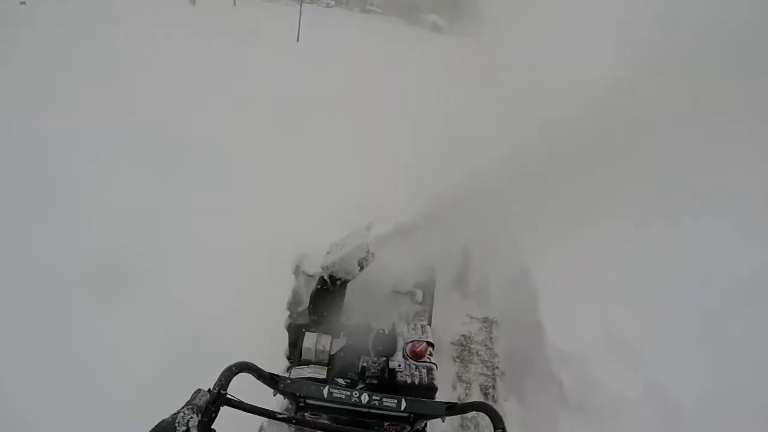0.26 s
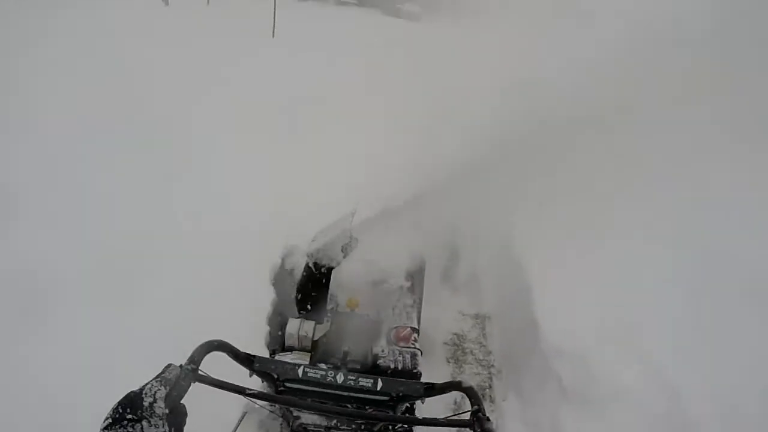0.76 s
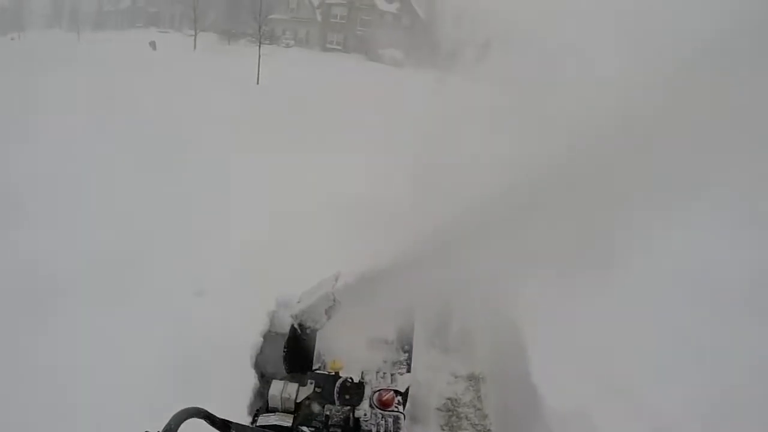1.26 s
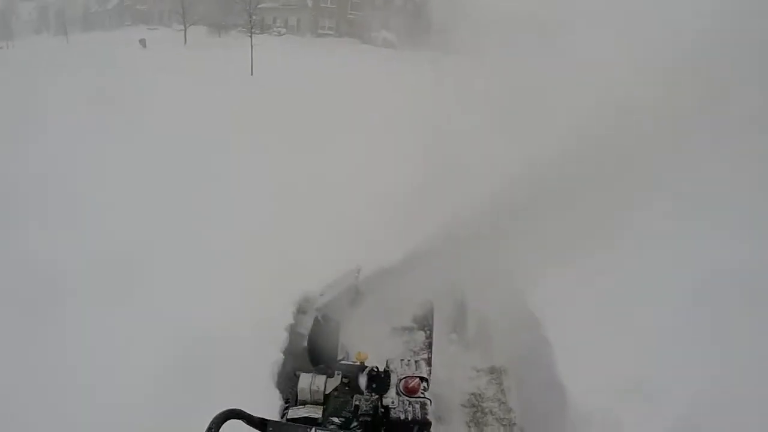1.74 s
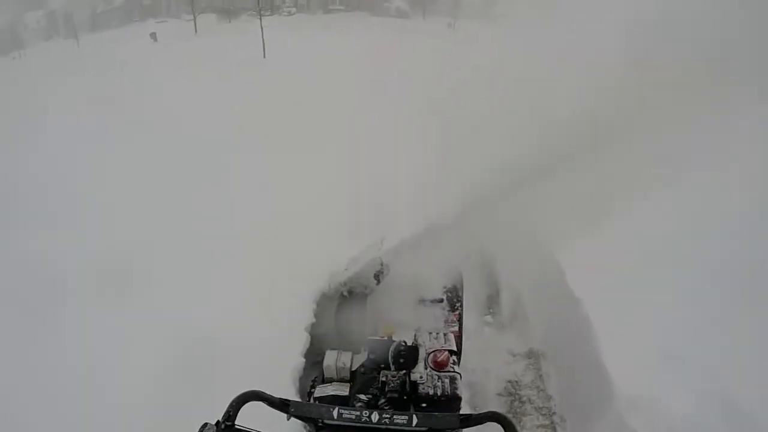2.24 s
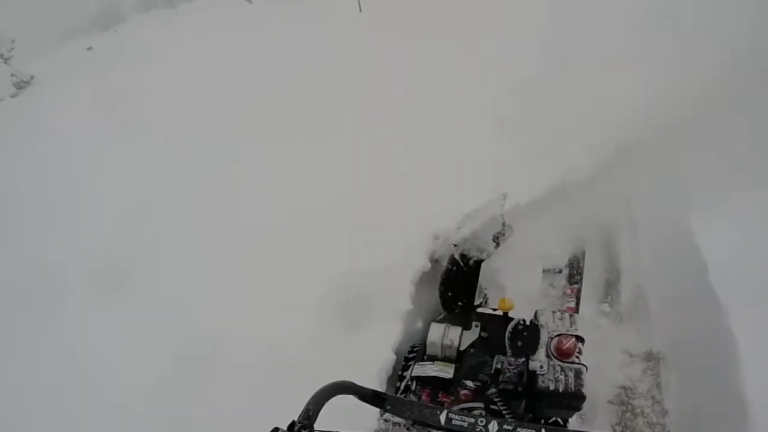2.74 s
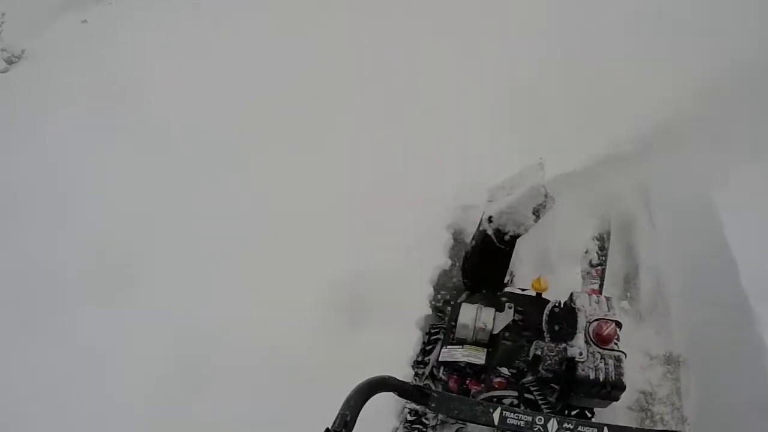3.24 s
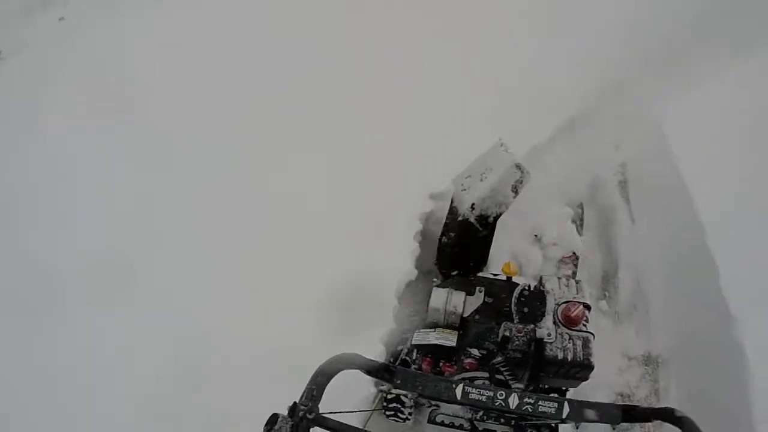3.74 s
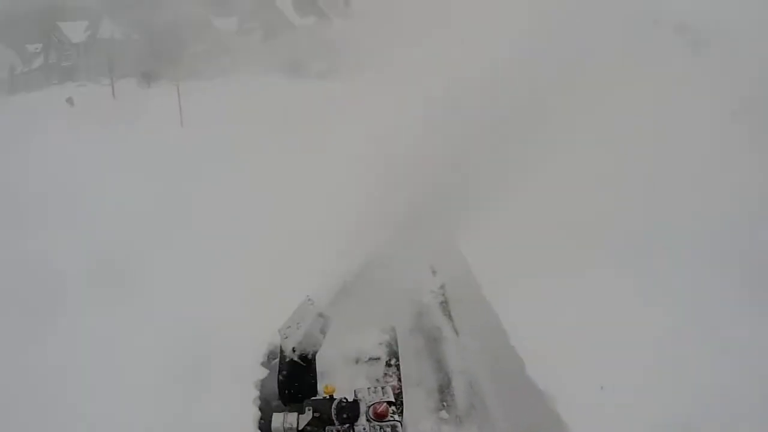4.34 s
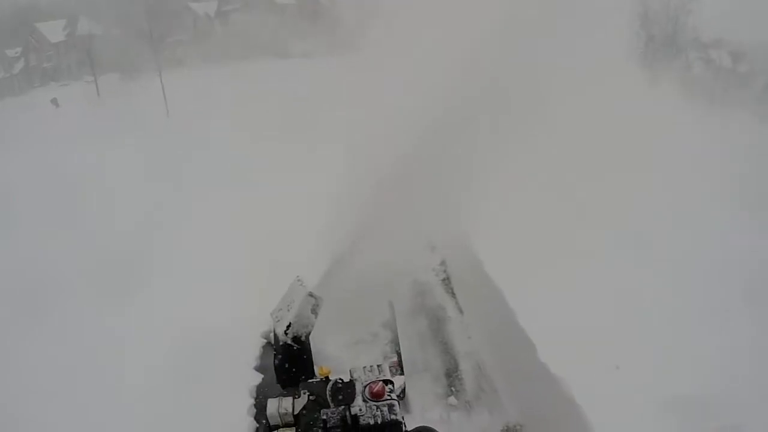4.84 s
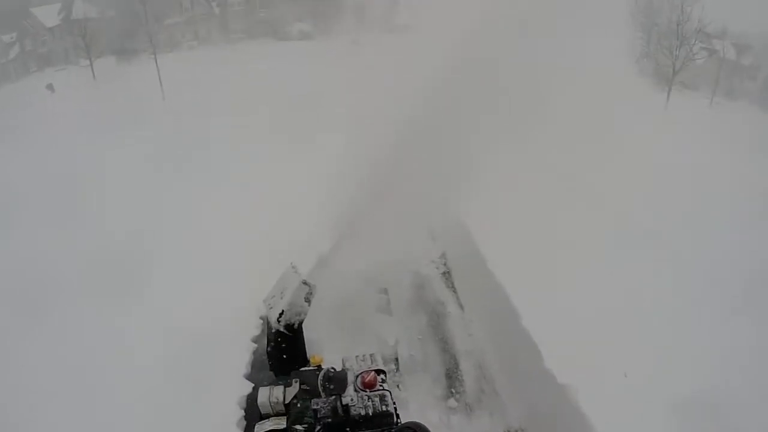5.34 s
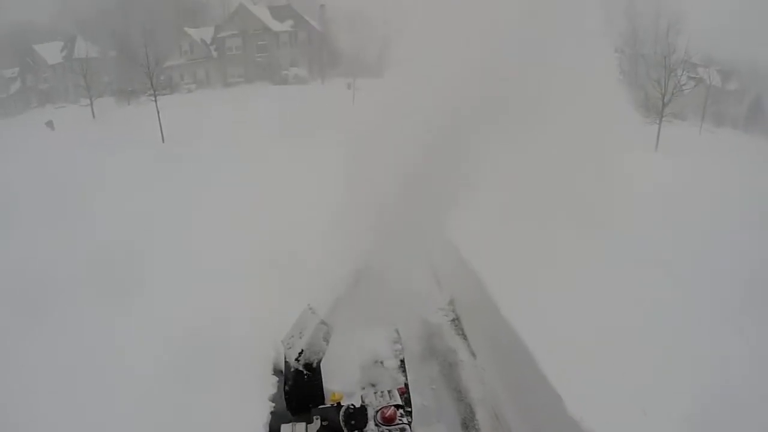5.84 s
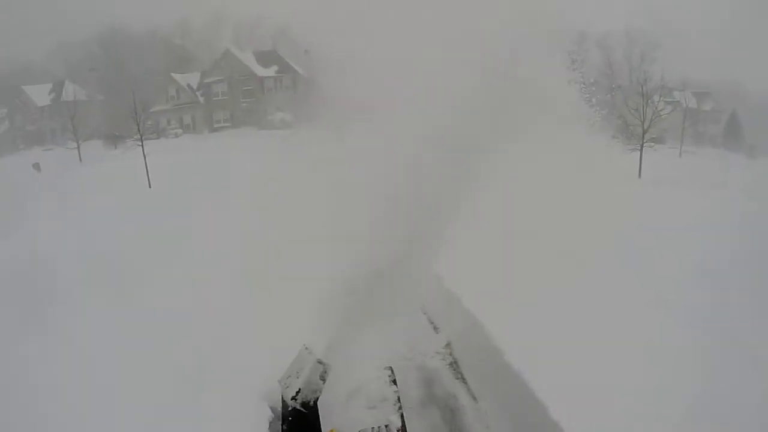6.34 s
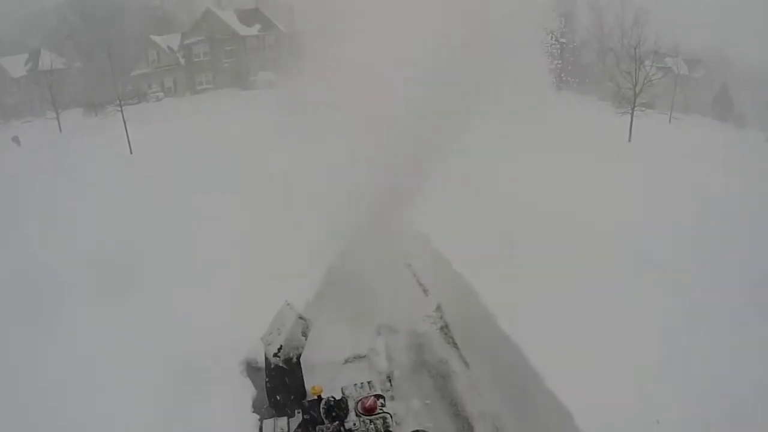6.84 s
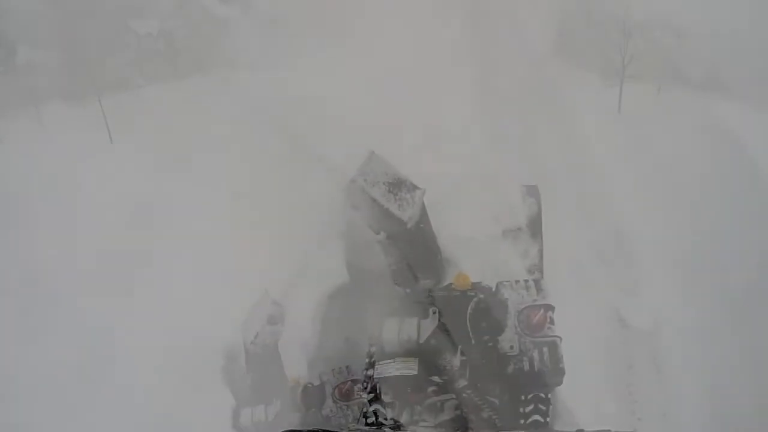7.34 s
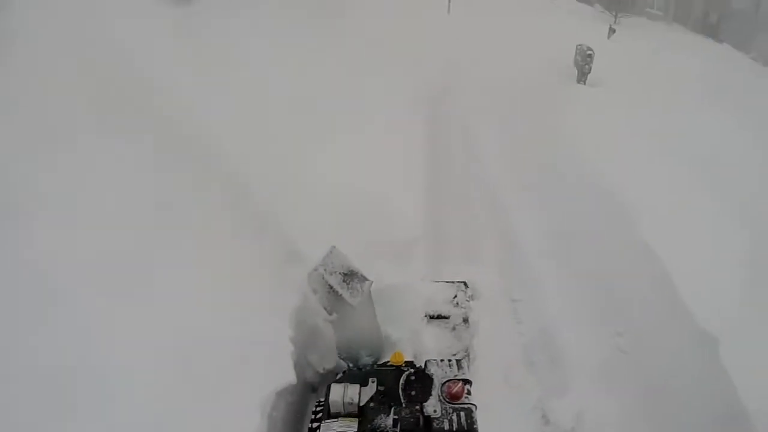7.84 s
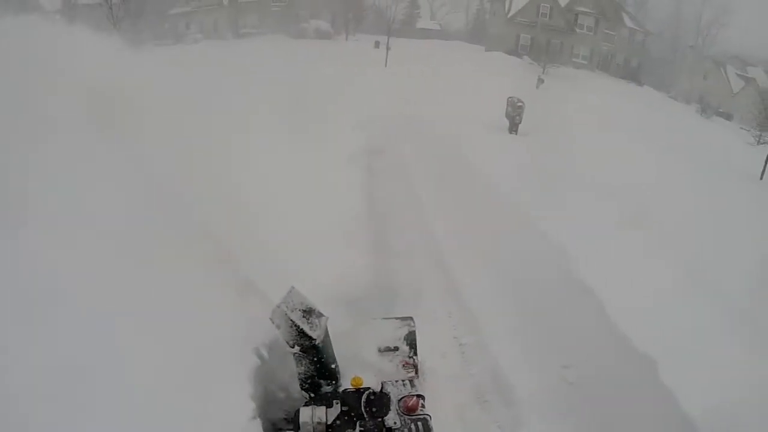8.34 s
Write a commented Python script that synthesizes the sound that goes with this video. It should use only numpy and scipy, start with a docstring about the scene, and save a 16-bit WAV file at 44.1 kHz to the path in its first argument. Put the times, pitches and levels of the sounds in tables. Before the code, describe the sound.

Close up, a snowblower engine putters and drones without pause while snow hisses through its chute and wind softly bumps the microphone.

```python
"""A rasping, whistling putter over a hum and a hiss: a petrol snowblower, heard from its handlebar.
Each firing of the single cylinder puffs gas out of the muffler. The belt-driven impeller beats against
the engine note, snow scours the chute, and wind and steps add low bumps. The sound swells as the listener
leans over the engine. At 7.29 s it jumps to a second pass, which starts in deep snow and then eases."""
import sys
import numpy as np
from scipy import signal
from scipy.fft import rfft, irfft, next_fast_len
from scipy.io import wavfile
from scipy.ndimage import map_coordinates

SR = 44100
rng = np.random.default_rng(int(sys.argv[2]) if len(sys.argv) > 2 else 0)


def bounce(signal):
    """Save signal as a 16-bit WAV file at the path given by the first command-line argument."""
    frames = np.transpose(np.atleast_2d(signal))
    limited = np.clip(frames, -1, 1)
    pcm = np.round(limited * 32767).astype(np.int16)
    wavfile.write(sys.argv[1], SR, pcm)


N = 378819
TIME_S = np.arange(N) / SR

# Engine speed per pass; the governor hunts. Each row: time in seconds, firings per second.
FIRING_RATE_FIRST = [(0.009, 27.812), (0.47, 28.01), (0.9, 27.789), (1.37, 27.548), (1.81, 27.781),
                     (2.28, 27.686), (2.75, 27.71), (3.18, 28.171), (3.64, 27.849), (4.11, 27.747),
                     (4.54, 28.142), (5.0, 27.73), (5.47, 27.784), (5.9, 27.809), (6.37, 27.882),
                     (6.8, 27.584), (7.27, 27.981)]
FIRING_RATE_SECOND = [(7.332, 26.666), (7.74, 27.3), (8.18, 27.6), (8.58, 27.582)]
# Firings of set strength, most accented. Each row: time in seconds, gain in dB.
BARKS = [(.116, 3.5), (.402, 2), (.76, 2), (.832, 0.5), (.939, 0), (1.12, 3), (2.854, 1.5), (3.068, 2),
         (3.46, 2), (3.64, 2.5), (3.962, 2), (8.066, 1.5), (8.465, 2.5)]
# Events in one cycle. Each row: start in seconds after the valve opens, rise in seconds, relative dB.
GAS_BURSTS = [(.0001, .00165, 0), (.0078, .0017, -12), (.015, .003, -21), (.0225, .002, -18)]  # blowdown first
KNOCKS = [(.0015, 0.0014, -3), (.0115, 0.00091, -1), (.0255, .0008, -22), (.029, 0.00045, -20)]  # valve gear and piston

# Resonances. Each row: centre in Hz, width in Hz, relative level in dB.
MUFFLER_MODES_FIRST = [(704, 210, -17), (1660, 600, -18), (2760, 1900, -15), (3436, 750, -6.5),
                       (4890, 400, -11), (5680, 650, -3.5), (6720, 540, -10), (8690, 960, -14.5),
                       (9220, 1600, -11), (9500, 1500, -14.5), (11560, 1260, -16), (13100, 1260, -20.5),
                       (15040, 1340, -30)]
MUFFLER_MODES_SECOND = [(650, 940, -17.5), (1830, 150, -7), (3180, 1600, -10.5), (3620, 470, -8),
                        (5120, 740, -5.5), (5650, 540, -3.5), (6600, 430, -7), (7300, 380, -11.5),
                        (8500, 630, -9), (9640, 1150, -6.5), (11100, 530, -14), (12340, 1890, -12.5),
                        (14780, 1200, -21)]
HOUSING_MODES_FIRST = [(250, 200, -9), (500, 700, -9), (730, 200, -11), (950, 130, -12), (1550, 350, -7),
                       (1760, 300, -2), (2410, 500, 1), (2930, 900, -4), (3500, 620, 0), (5060, 690, -1),
                       (5740, 620, -3), (6560, 800, -7), (9000, 2000, -12), (10050, 950, -14),
                       (11680, 1200, -18), (13530, 2300, -23.5)]  # steel housing and chute
HOUSING_MODES_SECOND = [(280, 200, -8), (520, 420, -14), (700, 250, -13), (930, 160, -15),
                        (1500, 1100, -16), (1800, 320, -3), (2360, 450, -5), (2870, 390, -4),
                        (3470, 1030, -4), (4880, 370, -4), (5430, 790, -3), (6560, 500, -8),
                        (8220, 3260, -15), (9300, 1150, -14), (11540, 2030, -20), (12480, 730, -15),
                        (14370, 1860, -24)]
CLOSE_MODES = [(2300, 1200, -13.5), (3640, 590, -4.5), (6540, 600, -3.5), (8360, 560, -7),
               (12200, 580, -35), (14600, 1000, -17)]  # heard just above the engine
UPRIGHT_MODES = [(2440, 280, -7), (5630, 560, 2.5), (10210, 760, -4), (11780, 700, -8), (13770, 850, -9)]  # heard standing upright
# Bands that cancel between the panels. Each row: centre in Hz, width in Hz, gain in dB.
PANEL_NOTCHES = [(1020, 43, -4), (1426, 47, -16), (1890, 53, -3), (4600, 820, -0.5)]

# Engine note. Each row: multiple of the firing rate, relative level in dB.
ENGINE_PARTIALS_FIRST = [(1, -61), (2, -49), (3, -57), (4, -52), (5, -50), (6, -53.5), (7, -56), (8, -47.5),
                         (9, -59), (10, -56), (11, -58), (12, -74), (14, -76), (15, -58), (17, -63),
                         (19, -59), (21, -75), (23, -69), (24, -58.5), (25, -71.5), (26, -58), (27, -61),
                         (30, -70), (34, -72), (35, -75), (36, -64), (38, -69.5), (48, -73.5), (53, -56.5),
                         (58, -79), (63, -55), (70, -62.5)]
ENGINE_PARTIALS_SECOND = [(1, -62), (2, -47.5), (3, -57), (4, -51), (5, -53), (6, -56), (7, -56), (8, -47),
                          (9, -57.5), (11, -53.5), (12, -55.5), (14, -68), (16, -60), (17, -71), (20, -57),
                          (22, -79), (24, -56.5), (25, -77), (26, -56), (31, -69), (34, -57.5), (36, -75),
                          (48, -86), (55, -56.5), (59, -85), (65, -52.5), (70, -67)]
UPRIGHT_PARTIALS = [(1, -40), (2, -12), (3, -49), (24, -34), (26, -13), (27, -14), (28, -20.5), (33, -17.5),
                    (34, -13), (35, -13.5), (36, -17), (37, -29)]  # crank throb and whine heard upright
# Impeller hum. Each row: multiple of the blade rate, relative level in dB.
IMPELLER_PARTIALS = [(1, -58), (2, -64.5), (3, -56), (4, -58), (5, -58.5), (6, -61.5), (8, -64.5),
                     (10, -63), (14, -63.5), (19, -84)]

# Muffler whistle, loudest when the engine labours in deep snow. Each row: time in seconds, level in dB.
WHISTLE_LEVEL_FIRST = [(0, -36), (.75, -31.5), (1.25, -34), (1.7, -41), (3.0, -34), (3.6, -27), (4.3, -51),
                       (4.8, -44.5), (7.29, -51)]
# Listener's posture. Each row: time in seconds, lean from 0 (upright) to 1 (over the engine).
LEAN_FIRST = [(0, 0.39), (1.0, .33), (1.6, 0.11), (2.3, 0.58), (3.2, 1), (4.0, 0.71), (4.35, .15),
              (5.5, 0.094), (7.29, 0.16)]
# Soft bumps on the microphone. Each row: centre in seconds, envelope peak in dB, frequency in Hz.
BUMPS = [(.417, -29, 63), (.891, -28.5, 57), (1.419, -33, 44), (2.43, -32, 55), (2.876, -27, 30.2),
         (5.834, -27, 52.7), (6.29, -31, 34), (8.556, -32, 58)]


def from_db(db):
    """Decibels to gain."""
    return 10 ** (np.asarray(db) / 20)


def unit_rms(x):
    """Scale to rms 1."""
    return x / np.sqrt(np.mean(x ** 2) + 1e-20)


def curve(rows):
    """Breakpoints interpolated to every sample."""
    return np.interp(TIME_S, *np.transpose(rows))


def drift(rate_hz):
    """Smooth random wander, rms 1."""
    knots = rng.standard_normal(int(TIME_S[-1] * rate_hz) + 4)
    coarse_s = TIME_S[::10]
    wander = map_coordinates(knots, [coarse_s * rate_hz], order=2, mode="nearest")
    return unit_rms(np.interp(TIME_S, coarse_s, wander))


def resonant_noise(modes):
    """Turbulence through steep-sided resonances and the panel notches, rms 1."""
    size = next_fast_len(N)
    hz = np.fft.rfftfreq(size, 1 / SR)

    def band(centre_hz, width_hz):
        return 1 / (1 + (2 * (hz - centre_hz) / width_hz) ** 2) ** 2

    power = sum(from_db(db) ** 2 * band(centre, width) for centre, width, db in modes)
    notch_db = sum(db * band(centre, width) for centre, width, db in PANEL_NOTCHES)
    spectrum = rfft(rng.standard_normal(size)) * np.sqrt(power) * from_db(notch_db)
    return unit_rms(irfft(spectrum, size)[:N])


def burst(age_s, rise_s):
    """Quick swell to 1, slower fall."""
    u = np.maximum(age_s, 0) / rise_s
    return u * np.exp(1 - u)


def burst_power(age_s, rows):
    """Summed power of the bursts in a cycle."""
    return sum((from_db(db) * burst(age_s - start_s, rise_s)) ** 2 for start_s, rise_s, db in rows)


def hum(cycles, partials, size=2048):
    """Note locked to a rotation; unlisted partials are interpolated, higher ones scatter in phase."""
    multiple, db = np.transpose(partials)
    k = np.arange(1, round(multiple[-1]) + 1)
    phase_rad = rng.standard_normal(len(k)) * ((k - 1) / 3) ** 2
    lines = from_db(np.interp(k, np.round(multiple), db)) * np.exp(1j * phase_rad)
    one_cycle = irfft(np.append(0, lines), size) * size / np.sqrt(2)
    return np.interp(cycles % 1, np.arange(size) / size, one_cycle, period=1)


def crank(firing_rate):
    """Engine cycles turned, index of the current firing, seconds since its exhaust valve opened."""
    rate_hz = curve(firing_rate)
    cycles = np.cumsum(rate_hz) / SR
    cycles -= np.interp(firing_rate[0][0], TIME_S, cycles)
    valve_cycles = cycles + .066  # the valve opens ahead of the cycle
    firing = (np.floor(valve_cycles) - np.floor(valve_cycles[0])).astype(int)
    return cycles, firing, valve_cycles % 1 / rate_hz


def exhaust(firing, age_s, jet, rasp_db, whistle_db, whistle_hz, waver_hz):
    """Each firing lets a gas jet out of the muffler and makes its outlet whistle briefly."""
    force, tone, pitch, phase, late = rng.standard_normal((firing[-1] + 1, 5)).T
    force_db = 0.5 * force
    for time_s, gain_db in BARKS:
        force_db[firing[round(time_s * SR)]] = gain_db
    age_s = age_s - 0.000235 * np.abs(late[firing])  # no two charges burn alike
    rasp = from_db(rasp_db) * unit_rms(np.sqrt(burst_power(age_s, GAS_BURSTS)) * jet)
    swell = burst(age_s, 0.0026) ** 2 + from_db(-20) * burst(age_s - .008, 0.0065)  # lags the rasp
    cycles = (whistle_hz + waver_hz * pitch[firing]) * age_s + phase[firing]
    whistle = unit_rms(swell * np.sin(2 * np.pi * cycles + 0.37 * drift(700)))
    whistle *= from_db(whistle_db + 2.5 * tone[firing])
    return from_db(force_db[firing]) * (rasp + whistle)


def housing(age_s, hiss, level_db, flutter_db=.5, grain_db=1.5):
    """Snow scours housing and chute in a grainy hiss; engine knocks shake the same steel."""
    knocking = np.sqrt(1 + burst_power(age_s, KNOCKS))
    scouring = from_db(flutter_db * drift(14) + grain_db * drift(900))
    return from_db(level_db) * unit_rms(knocking * scouring * hiss)


def drone(cycles, partials, level_db, impeller_db, lean=0, blades_per_firing=1.933):
    """The impeller beats against the engine's second partial; from close above, the block booms."""
    engine = from_db(.5 * drift(25)) * hum(cycles + .001 * drift(20), partials)
    blade_cycles = blades_per_firing * cycles + .025 * drift(1)  # belt slip
    impeller = from_db(impeller_db + 1.44 * drift(13)) * hum(blade_cycles, IMPELLER_PARTIALS)
    note = engine + impeller
    boom = signal.sosfilt(signal.butter(1, (85, 175), "band", fs=SR, output="sos"), note)
    return from_db(level_db) * unit_rms(note + from_db(-8) * lean * boom)


def first_pass():
    """Steady work; louder and different in colour while the listener leans over the engine."""
    cycles, firing, age_s = crank(FIRING_RATE_FIRST)
    lean = curve(LEAN_FIRST)
    near = lean ** 2
    jet = resonant_noise(MUFFLER_MODES_FIRST)
    jet += from_db(-2) * lean * resonant_noise(CLOSE_MODES)
    jet += from_db(-1.5) * (1 - lean) * resonant_noise(UPRIGHT_MODES)
    hiss = resonant_noise(HOUSING_MODES_FIRST) + from_db(-16) * lean * resonant_noise(CLOSE_MODES)
    puffs = exhaust(firing, age_s, jet, rasp_db=-34.5 + 3 * near,
                    whistle_db=curve(WHISTLE_LEVEL_FIRST), whistle_hz=3594, waver_hz=43.3)
    snow = housing(age_s, hiss, level_db=-37.5 + 3.5 * near)
    note = drone(cycles, ENGINE_PARTIALS_FIRST, level_db=-41 + 2 * near, impeller_db=0.5, lean=lean)
    upright_note = from_db(-45) * (1 - lean) ** 2 * hum(cycles, UPRIGHT_PARTIALS)
    return puffs + snow + note + upright_note


def buffeting(rumble_db=-52, band_hz=(14, 48), gust_db=3):
    """Wind and the walker's steps jostle the microphone."""
    rumble = signal.sosfilt(signal.butter(2, band_hz, "band", fs=SR, output="sos"), rng.standard_normal(N))
    out = from_db(rumble_db) * unit_rms(rumble * from_db(gust_db * drift(4.8)))
    for centre_s, db, hz in BUMPS:
        span = np.abs(TIME_S - centre_s) < .1
        cycles = (TIME_S[span] - centre_s) * hz
        out[span] += from_db(db) * np.exp(-(cycles / 0.67) ** 2) * np.sin(2 * np.pi * cycles)
    return out


def second_pass(ease_start_s=7.64, ease_decay_s=0.41):
    """The engine recovers from a sag in deep snow; two whistles fade as the load eases."""
    cycles, firing, age_s = crank(FIRING_RATE_SECOND)
    load = np.exp(-np.maximum(TIME_S - ease_start_s, 0) / ease_decay_s)
    whistle_db = -45.5 + 11 * load ** 2
    jet = resonant_noise(MUFFLER_MODES_SECOND)
    puffs = exhaust(firing, age_s, jet, rasp_db=-32.5,
                    whistle_db=whistle_db, whistle_hz=3674, waver_hz=110)
    low_whistle = exhaust(firing, age_s, jet, rasp_db=-np.inf,
                          whistle_db=whistle_db - 3.5, whistle_hz=3120, waver_hz=135)
    snow = housing(age_s, resonant_noise(HOUSING_MODES_SECOND), level_db=-37.5 + 3.5 * load)
    note = drone(cycles, ENGINE_PARTIALS_SECOND, level_db=-41.5 + 2.5 * load, impeller_db=-1.5)
    return puffs + low_whistle + snow + note


def scene(second_pass_s=7.29):
    """Two passes in the open, mono; fresh snow gives no echo."""
    machine = np.where(TIME_S < second_pass_s, first_pass(), second_pass())
    return (machine + buffeting())[None]


def record(dry, cutoff_hz=15400):
    """Steep low-pass."""
    return signal.sosfilt(signal.ellip(10, .2, 70, cutoff_hz, fs=SR, output="sos"), dry)


dry = scene()
out = record(dry)
bounce(out)
```